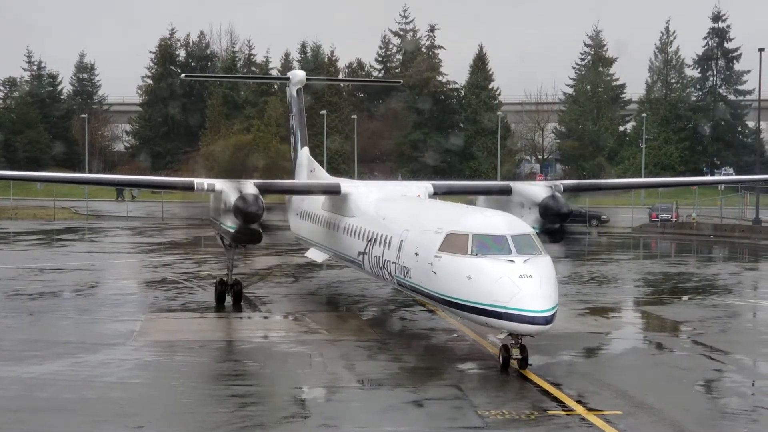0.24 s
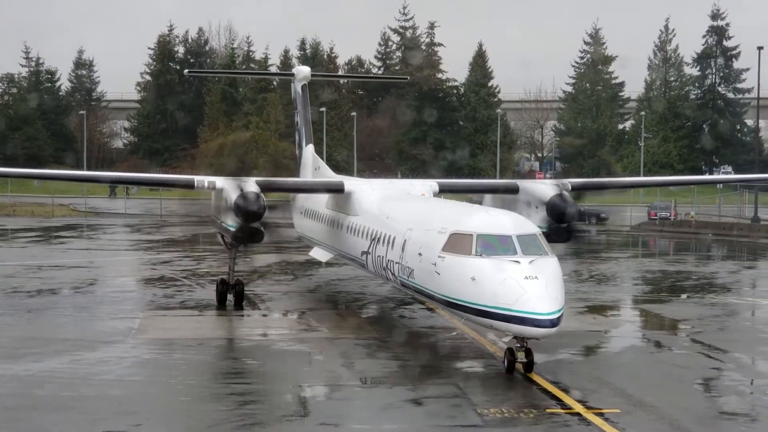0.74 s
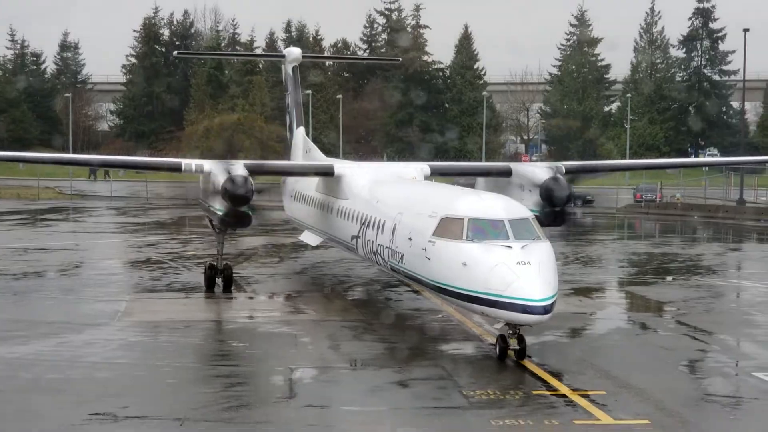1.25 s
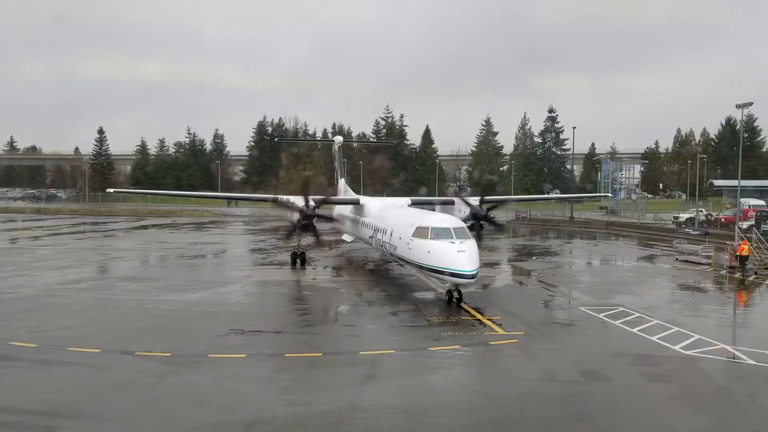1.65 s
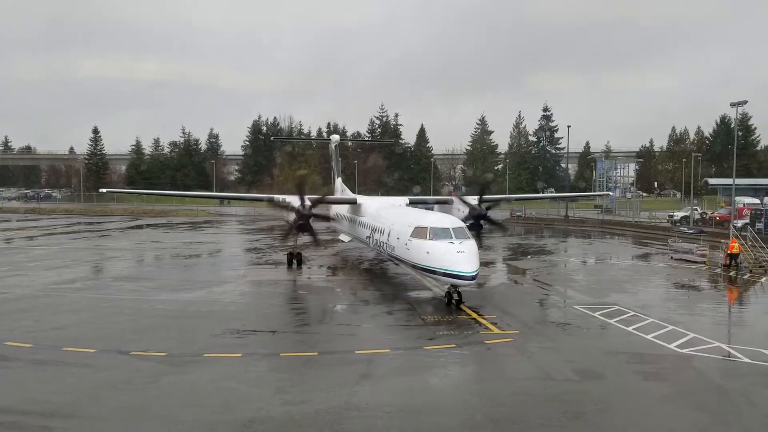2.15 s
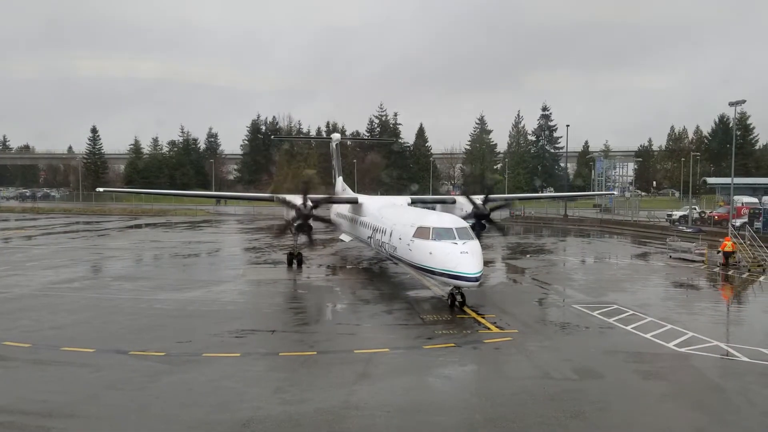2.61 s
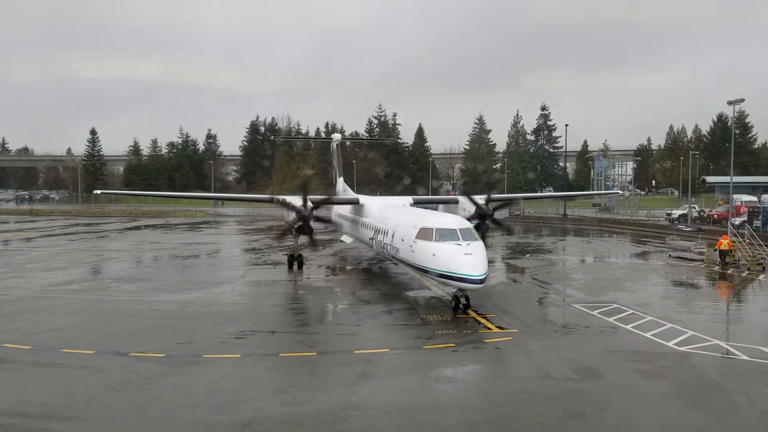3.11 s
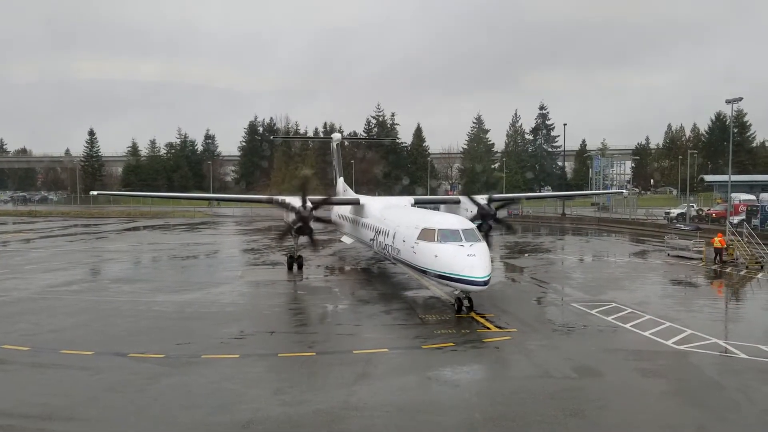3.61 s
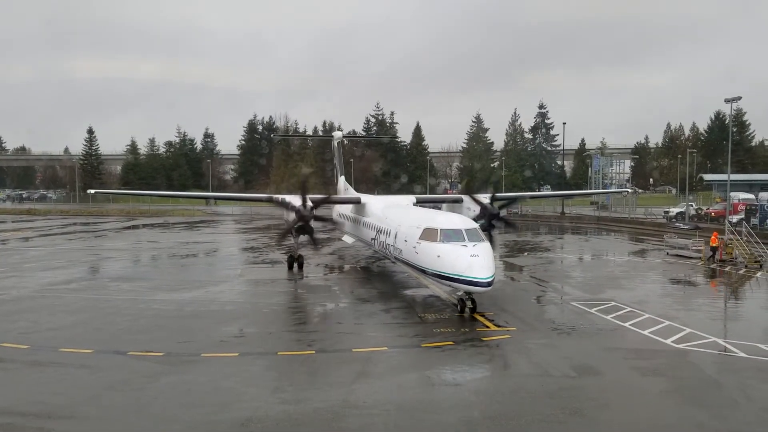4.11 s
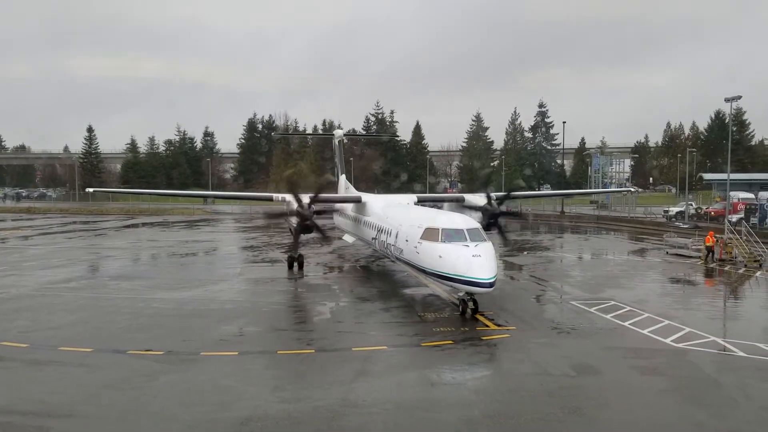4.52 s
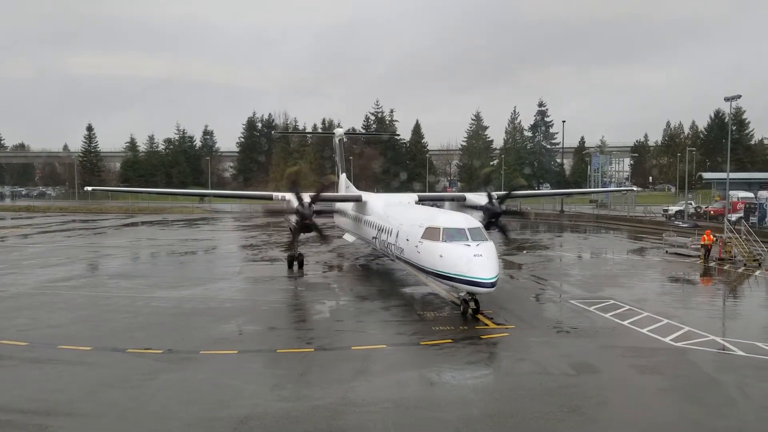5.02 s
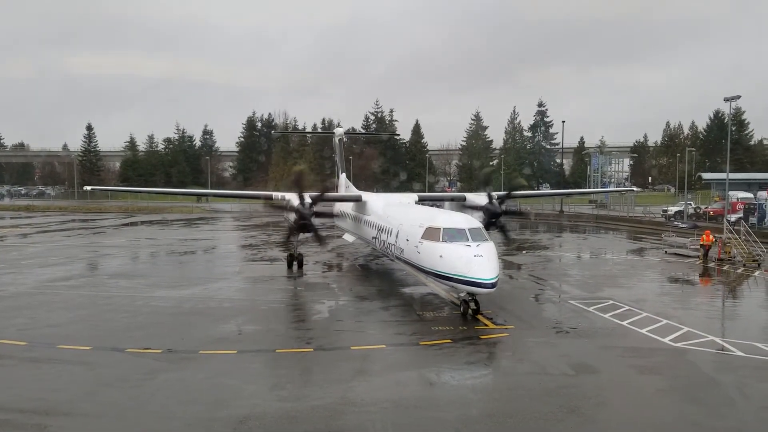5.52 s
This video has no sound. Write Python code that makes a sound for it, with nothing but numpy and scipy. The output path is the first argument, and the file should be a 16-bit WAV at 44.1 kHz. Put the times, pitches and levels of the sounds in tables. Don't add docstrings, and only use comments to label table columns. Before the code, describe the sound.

Outdoors on a wet apron, a twin turboprop idles and rolls slowly toward a handheld camera. Two close, high turbine whines beat against each other above a low, uneven propeller drone and broad airy roar. About half a second in, a button clicks sharply on the camera body, followed by a tiny finger squeak. The engine sound is continuous and grows somewhat louder and fuller in the last second and a half.

```python
import sys
import numpy as np
from scipy import signal
from scipy.fft import rfft, irfft, next_fast_len
from scipy.io import wavfile
from scipy.ndimage import uniform_filter1d, map_coordinates

SR = 44100
rng = np.random.default_rng(int(sys.argv[2]) if len(sys.argv) > 2 else 0)


def boost_factor(decibels):
    exponent = np.asarray(decibels, float) / 20
    return 10 ** exponent


def wav_record(signal):
    frames = np.transpose(np.atleast_2d(signal))
    bounded = np.clip(frames, -1, 1)
    quanta = np.round(bounded * 32767).astype(np.int16)
    wavfile.write(sys.argv[1], SR, quanta)


N = 253575
BLADE_HZ = 66.1


def unit(x):
    return x / np.sqrt(np.mean(x ** 2) + 1e-20)


def along(points, hz):
    point_hz, value = np.transpose(points)
    return np.interp(np.log(hz + 1), np.log(point_hz + 1), value)


def curves(rows):
    time_s, *columns = np.transpose(rows)
    return [np.interp(np.arange(N) / SR, time_s, column) for column in columns]


def wobble(rate_hz):
    knots = rng.standard_normal(int(N * 40 / SR))
    return map_coordinates(knots, [np.arange(N) * min(rate_hz, 30) / SR])


def filtered(x, response):
    size = next_fast_len(N + SR // 2)
    spectrum = rfft(x, size) * response(np.fft.rfftfreq(size, 1 / SR))
    return irfft(spectrum, size)[..., :N]


def peak(centre_hz, width_hz):
    return lambda hz: 1 / (1 + (2 * (hz - centre_hz) / width_hz) ** 2)


def noise(response):
    return unit(filtered(rng.standard_normal((2, N)), response))


def bells(rows):
    def shape(hz):
        power = 0
        for centre_hz, width_hz, level_db in rows:
            to_unit = np.sqrt(2 * SR / (np.pi * width_hz))
            power = power + (boost_factor(level_db) * to_unit * peak(centre_hz, width_hz)(hz)) ** 2
        return np.sqrt(power)
    return filtered(rng.standard_normal((2, N)), shape)


def smooth_power(x, span):
    return np.abs(uniform_filter1d(uniform_filter1d(x ** 2, span), span))


def steadied(pair, hold_s):
    return unit(pair / np.sqrt(smooth_power(pair, int(hold_s * SR)) + 0.08))


def swells(events, which):
    t = np.arange(0, N + 64, 64) / SR
    gain = np.zeros(len(t))
    for peak_s, multiple, peak_db, half_s in events:
        if round(multiple) == round(which):
            gain += boost_factor(peak_db) * np.exp(-((t - peak_s) / half_s) ** 2)
    return np.interp(np.arange(N) / SR, t, gain)


# freq [Hz], left_right_likeness [0..1]
PORT_LIKENESS = [(60, 0.99), (110, 0.99), (200, 0.99), (380, 0.92), (700, 0.63), (1290, 0.029),
                 (2380, 0.52), (4390, 0.37), (8110, 0.25), (15000, 0.2)]
# freq [Hz], left_minus_right [dB]
PORT_LEAN = [(60, 1.0), (130, 1.0), (290, 2), (640, 1), (1410, 2.5), (3090, 3), (6810, 4.5), (15000, 1)]


def placed(pair):
    def mid_side(hz):
        turn = np.arccos(np.clip(along(PORT_LIKENESS, hz), -1, 1)) / 2
        return np.array([np.cos(turn), np.sin(turn)])
    mid, side = filtered(pair, mid_side)
    lean = lambda hz: boost_factor(np.outer([.5, -.5], along(PORT_LEAN, hz)))
    return filtered(np.array([mid + side, mid - side]), lean)


# centre_time [s], length [s], centre [Hz], width [Hz], level [dB]
FINGER_STROKES = [
    (.48, .025, 12000, 7000, -59),
    (.725, .015, 4880, 40, -39.5),
    (1.61, .03, 12000, 5000, -65),
    (4.363, 0.013, 7400, 900, -52),
    (5.22, 0.033, 11500, 1500, -64),
]


def fingers():
    t = np.arange(N) / SR
    out = np.zeros((2, N))
    for centre_s, length_s, centre_hz, width_hz, level_db in FINGER_STROKES:
        puff = np.exp(-((t - centre_s) / length_s) ** 2)
        out += boost_factor(level_db) * puff * steadied(noise(peak(centre_hz, width_hz)), hold_s=.01)
    return out * boost_factor([[1.5], [-1.5]])


# start [s], peak [dB], left_minus_right [dB], rattle [dB], rattle_t60 [s]
BUTTON_CONTACTS = [
    (0.5137, -52, 5, -15, .05),
    (0.5715, -59, 13, 14, 0.059),
    (0.5783, -34.5, -6, 1, 0.054),
    (.586, -53.5, 4, 13, 0.24),
]
# centre [Hz], width [Hz], level [dB]
SHELL_MODES = [(3200, 1800, 1), (4900, 900, 3), (5900, 1000, 4), (7500, 1600, 0), (9900, 2200, -1),
               (12500, 3000, -8)]


def shell(hz):
    total = 0
    for k, (centre_hz, width_hz, level_db) in enumerate(SHELL_MODES):
        damping = 1j * hz * width_hz
        total = total + (-1) ** k * boost_factor(level_db) * damping / (centre_hz * centre_hz - hz * hz + damping)
    return total


def button():
    out = np.zeros((2, N + SR))
    t = np.arange(SR // 5) / SR
    for start_s, peak_db, pan_db, rattle_db, t60_s in BUTTON_CONTACTS:
        grain_db = 3 * rng.standard_normal(len(t) // 40 + 1)
        grain = np.repeat(boost_factor(grain_db), repeats=40)[:len(t)]
        shared = rng.standard_normal(len(t))
        buzz = unit(grain) * (shared + 1.6 * rng.standard_normal((2, len(t))))
        crack = (boost_factor(-60 * t / .03) + .7 * boost_factor(-60 * t / .006)) * buzz
        rattle = boost_factor(rattle_db + 3 - 60 * t / t60_s) * uniform_filter1d(buzz, size=4)
        burst = (crack + rattle) * (1 - np.exp(-t / .0004))
        port_db = peak_db + 6 + np.array([[.5], [-.5]]) * pan_db
        out[:, round(start_s * SR):][:, :len(t)] += boost_factor(port_db) * burst
    return filtered(out[:, :N], shell)


# time [s], roar_gain [dB]
APPROACH_GAIN = [(0.0, 0), (2.0, 0.1), (3.8, .5), (4.4, 2.5), (5.1, 3.5), (5.75, 3.5)]
# freq [Hz], density [dB per Hz]
EXHAUST_COLOUR = [(20, -12), (40, -3.5), (110, 2), (220, 0), (420, -8), (700, -10), (950, -19),
                  (1450, -23.5), (2500, -49.5)]
INTAKE_COLOUR = [(900, -10), (1500, -11), (2000, -1.5), (2800, 0.5), (3600, -4), (5000, -5), (6000, -8),
                 (7000, -12.5), (8500, -26), (10000, -55)]
HISS_COLOUR = [(6000, -14), (8000, -22), (9000, 3.5), (10000, 10), (11000, 3.5), (12400, 4), (13500, 4),
               (14500, -2)]
# centre [Hz], width [Hz], over_intake [dB]
SPOOL_BANDS = [(4148, 400, 6), (4940, 70, -35), (5640, 190, -9.5), (5930, 60, -12.5), (12300, 240, -32),
               (14200, 100, -30)]
# centre [Hz], width [Hz], level [dB]
HOWL_BANDS = [(2520, 110, -2.5), (2534, 14, -7), (2500, 10, -13), (2468, 10, -14)]
# peak_time [s], gain [dB]
HOWL_FLARES = [(.19, 3), (1.32, 2), (1.97, 4), (2.71, 7.5), (3.07, 7.5), (3.18, 7), (3.97, 7.5), (4.45, 5),
               (4.74, 3), (4.96, 3), (5.15, 5), (5.3, 7), (5.45, 2), (5.65, -1)]


def roar():
    t = np.arange(N) / SR
    near_db = curves(APPROACH_GAIN)[0]
    exhaust_db = -42 + 1.46 * near_db
    intake_db = -47 + 0.78 * near_db
    hiss_db = -65.5 + 0.4 * near_db
    howl_db = -51.5 + 0.17 * near_db
    wake_s, wake_db, stutter_db, flare_half_s = 2.55, 3.5, 1.5, 0.037
    howl_db = howl_db + wake_db / 2 * np.tanh((t - wake_s) / .4) + stutter_db * wobble(12)
    for flare_s, gain_db in HOWL_FLARES:
        howl_db = howl_db + gain_db * np.exp(-((t - flare_s) / flare_half_s) ** 2)
    chop = 1 + 0.054 * np.sin(2 * np.pi * BLADE_HZ * t)
    tinted = lambda points: noise(lambda hz: boost_factor(along(points, hz)))
    out = boost_factor(exhaust_db + 8.0 + 0.51 * wobble(7.6)) * tinted(EXHAUST_COLOUR)
    intake = boost_factor(5) * tinted(INTAKE_COLOUR) + bells(SPOOL_BANDS)
    out += boost_factor(intake_db + 0.55 * wobble(11.0)) * chop * intake
    out += boost_factor(howl_db + 1.9) * chop * bells(HOWL_BANDS)
    out += boost_factor(hiss_db + 1.5 + 0.61 * wobble(8.8)) * chop * tinted(HISS_COLOUR)
    top_hz = 14450
    return placed(filtered(out, lambda hz: hz < top_hz))


# time [s], level [dB]
BLADE_TONE = [(0.0, -34), (0.17, -46), (0.3, -37), (1.2, -43), (1.63, -37), (1.87, -47), (2.24, -33),
              (2.5, -32.5), (2.63, -40), (2.8, -35.5), (3.3, -40.5), (3.42, -28.5), (3.7, -33.5),
              (4.0, -38), (4.5, -39.5), (4.87, -26), (5.14, -30), (5.35, -36)]
# centre [Hz], width [Hz]
SMEARED_OVERTONES = [(325.5, 16), (128.4, 8.9), (195.25, 4.6), (254.6, 14.2), (380.2, 11)]
# multiple [blade rates], level [dB], growth [dB per dB of approach]
CALM_OVERTONES = [(5, -39, -2.5), (2, -38, 1.2), (3, -37, 0), (4, -33.5, 0.13), (6, -39.5, -1)]
# centre [Hz], width [Hz], level [dB]
FAINT_TONES = [(68.8, 0.75, -46.5), (93.9, 18, -42.5), (502, 7.3, -49), (545.6, 28, -46.5),
               (623.5, 21, -56)]
# peak_time [s], multiple [blade rates], peak [dB],
# half_length [s]
AIR_LUMPS = [(0.096, 3, -29, 0.16), (0.067, 4, -28, 0.14), (0.407, 3, -29.5, .07), (.55, 4, -23.5, 0.039),
             (.64, 3, -30.5, .05), (1.15, 2, -32, 0.48), (1.095, 3, -29.5, 0.37), (1.77, 3, -28.5, 0.12),
             (1.948, 4, -24.5, 0.035), (2.009, 2, -26, 0.072), (2.18, 4, -32, .06),
             (2.173, 2, -28.5, 0.054), (2.42, 3, -28, 0.068), (2.844, 2, -31, .07), (2.91, 3, -28.5, 0.12),
             (3.28, 4, -26, 0.034), (3.65, 3, -27, 0.084), (3.836, 3, -24, 0.042), (3.925, 4, -26.5, 0.066),
             (3.907, 6, -27.5, 0.029), (3.952, 2, -29, 0.21), (4.46, 4, -22.5, 0.022),
             (4.511, 2, -20.5, 0.019), (4.603, 3, -29, 0.028), (4.895, 4, -30, 0.15), (5.19, 3, -24, 0.028),
             (5.192, 4, -31, 0.023), (5.238, 6, -29, 0.067), (5.643, 2, -29.5, 0.19),
             (5.664, 4, -23, 0.049),
             (.0, 5, -26, 0.02), (0.017, 6, -33.5, 0.053), (.3, 5, -38, .15), (0.505, 6, -35, 0.22),
              (1.14, 5, -32.5, 0.1), (1.4, 5, -38, 0.024), (1.432, 4, -34, 0.058), (1.675, 6, -35, 0.12),
              (2.098, 6, -37, 0.13), (2.406, 6, -32, 0.086), (2.408, 4, -29.5, 0.24),
              (2.804, 5, -33.5, 0.1), (2.834, 4, -34, 0.19), (3.3, 6, -35.5, 0.054), (3.7, 5, -37.5, 0.097),
              (4.114, 6, -35, 0.087), (4.33, 3, -32.5, .1), (5.002, 6, -35, 0.034), (4.9, 2, -29, 0.13),
              (5.31, 2, -25, 0.056), (1.105, 4, -32.5, 0.28), (5.45, 4, -28, 0.17), (5.557, 5, -37, 0.029),
              (5.706, 3, -31.5, .08), (5.728, 5, -34, .05), (0.797, 6, -40.5, 0.068),
              (1.507, 3, -31.5, 0.071), (3.102, 2, -37, 0.24)]


def propellers():
    near_db = curves(APPROACH_GAIN)[0]
    phase = 2 * np.pi * np.cumsum(BLADE_HZ + .5 * wobble(1.994)) / SR
    first_db = curves(BLADE_TONE)[0] + 1.56 * wobble(9)
    out = np.sqrt(2) * boost_factor(first_db) * np.array([np.sin(phase), np.cos(phase)])
    for (centre_hz, width_hz), (multiple, calm_db, growth) in zip(SMEARED_OVERTONES, CALM_OVERTONES):
        calm = boost_factor(calm_db + growth * near_db + 3.2 * wobble(11))
        level = np.hypot(calm, swells(AIR_LUMPS, multiple))
        out += level * steadied(noise(peak(centre_hz, width_hz)), hold_s=.06)
    return placed(out + bells(FAINT_TONES))


# sideband [blade rates from tone], level [dB re left]
RIGHT_SHADE = [(0, -9.5), (-1, -6), (1, -8), (2, -5), (-2, -5), (3, -5)]


def compressor(engine, sides, glints):
    tone_hz, tone_db = curves(engine)
    levels = [boost_factor(tone_db)]
    for (first_db, last_db), (step, _) in zip(sides, RIGHT_SHADE[1:]):
        calm = boost_factor(np.linspace(first_db, last_db, N) + 2.2 * wobble(4.5))
        levels.append(np.hypot(calm, swells(glints, step)))
    _, below, _, second = levels
    levels += [below * boost_factor(-13), second * boost_factor(-7)]
    out = np.zeros((2, N))
    for (step, right_db), level in zip(RIGHT_SHADE, levels):
        turns = np.cumsum(tone_hz + step * BLADE_HZ) / SR + rng.random()
        phase = 2 * np.pi * turns + .35 * wobble(9)
        flutter = level * boost_factor(1.8 * wobble(11))
        out[0] += flutter * np.sin(phase)
        right = flutter * boost_factor(right_db + 1.1 * wobble(2.71))
        out[1] += right * np.sin(phase + 1.48 * wobble(2.49))
    return np.sqrt(2) * out


# time [s], pitch [Hz], level [dB]
NEAR_TONE = [(0.0, 4107.5, -41), (0.4, 4107.5, -47), (0.8, 4106.5, -38), (1.4, 4105.2, -49),
             (2.0, 4104.5, -38), (2.4, 4103.7, -45), (2.9, 4103.5, -36), (3.2, 4103.5, -38),
             (3.6, 4103.3, -33), (3.8, 4102.6, -37), (4.0, 4102.0, -33), (4.3, 4099, -38),
             (4.65, 4096.8, -28), (5.2, 4100.0, -28), (5.4, 4105.5, -31), (5.53, 4108.3, -43),
             (5.75, 4110.0, -32)]
FAR_TONE = [(0.0, 4135.5, -42), (0.6, 4137.0, -51), (0.95, 4136.5, -40), (1.2, 4136.7, -56),
            (1.7, 4136.4, -41), (2.2, 4135.5, -40), (2.4, 4135.5, -54), (2.6, 4134.7, -43),
            (2.8, 4133, -51), (3.0, 4131.5, -39), (4.15, 4121.3, -35), (4.4, 4120, -28), (4.6, 4118.4, -36),
            (4.85, 4115.6, -50), (5.1, 4111.5, -35), (5.42, 4102.5, -31), (5.55, 4098, -42),
            (5.75, 4093.0, -40)]
# first [dB], last [dB]
NEAR_SIDEBANDS = [(-46, -53), (-42, -45), (-55, -52)]
FAR_SIDEBANDS = [(-45, -44), (-42, -51), (-51, -55)]
# peak_time [s], sideband [blade rates], peak [dB], half_length [s]
NEAR_THROWS = [(0.307, 1, -36, 0.17), (.9, -1, -43.5, 0.37), (2.11, 2, -40.5, 0.3), (2.298, 1, -38, 0.21),
               (3.194, 2, -49, 1), (3.495, -1, -53, 0.11), (3.857, 1, -36, .3), (4.94, 1, -29.5, 0.12),
               (5.36, 1, -25.5, 0.065), (5.657, -1, -41, 0.064)]
FAR_THROWS = [(.05, 1, -38, .2), (1.0, 1, -35, .12), (1.45, 1, -39, .15), (1.6, -1, -39, .2),
              (2.15, 1, -39, .15), (2.4, -1, -42, .3), (2.65, 2, -45, .1), (4.05, -1, -40, .15),
              (4.35, 2, -44, .12), (5.15, -1, -35, .2)]
# time [s], level [dB]
WHINE_SWELL = [(0.1, -35), (0.54, -40.5), (0.93, -34), (1.26, -40), (1.54, -35), (1.67, -38.5), (2.14, -35),
               (2.5, -39), (2.74, -41), (2.9, -34), (3.13, -38), (3.45, -34.5), (4.12, -34), (4.19, -39.5),
               (4.3, -31.5), (5.48, -31), (5.53, -41.5), (5.7, -34.5)]


def whine():
    near = compressor(NEAR_TONE, NEAR_SIDEBANDS, NEAR_THROWS)
    both = near + compressor(FAR_TONE, FAR_SIDEBANDS, FAR_THROWS)
    power = smooth_power(both.mean(axis=0), SR // 8)
    return both * boost_factor(curves(WHINE_SWELL)[0]) / np.sqrt(power + 1e-9)


def scene():
    return fingers() + button() + roar() + propellers() + whine()


def band_limit(x):
    return signal.sosfilt(signal.butter(12, 15580, fs=SR, output="sos"), x)


def record(dry):
    return band_limit(dry)


dry = scene()
out = record(dry)
wav_record(out)
```